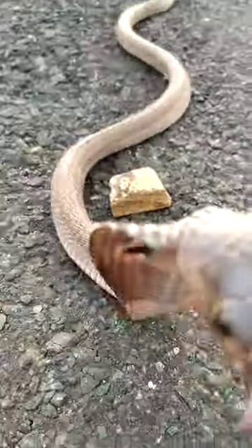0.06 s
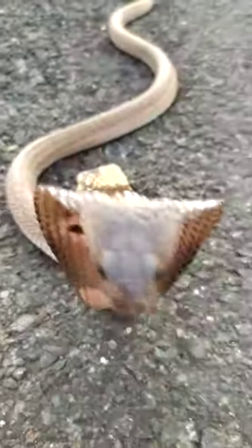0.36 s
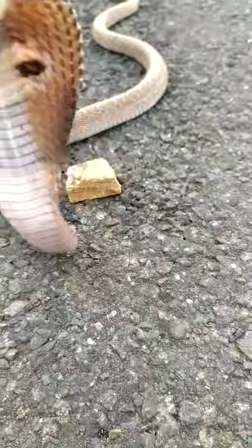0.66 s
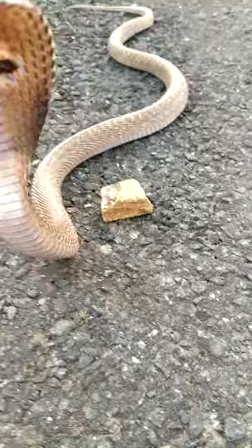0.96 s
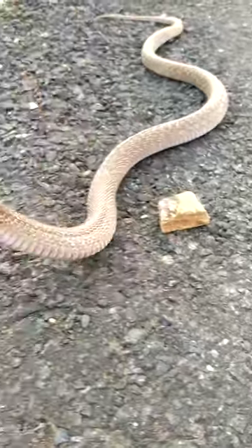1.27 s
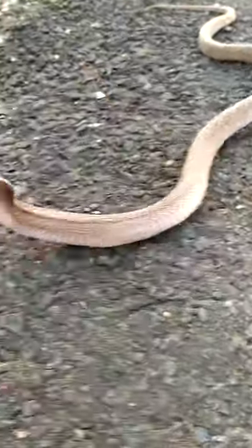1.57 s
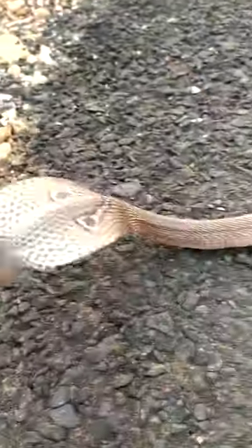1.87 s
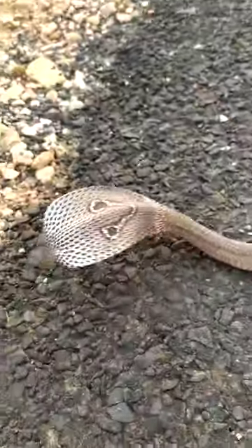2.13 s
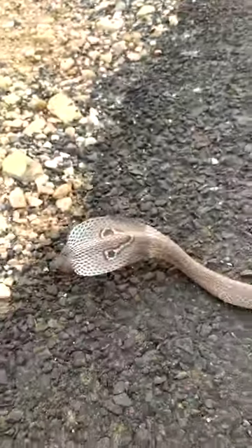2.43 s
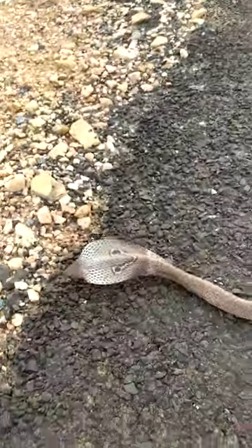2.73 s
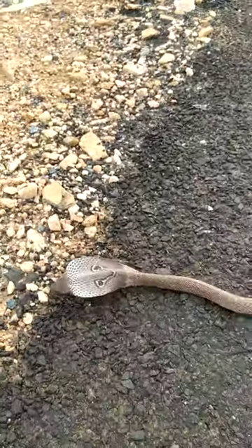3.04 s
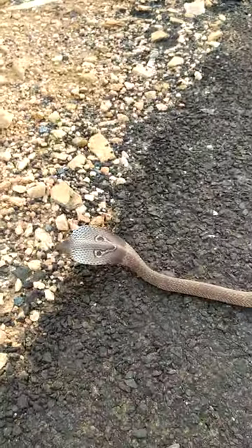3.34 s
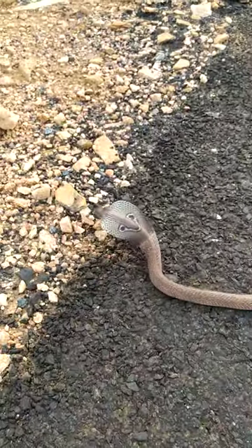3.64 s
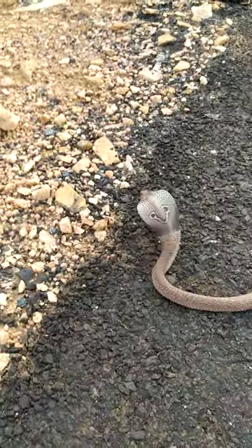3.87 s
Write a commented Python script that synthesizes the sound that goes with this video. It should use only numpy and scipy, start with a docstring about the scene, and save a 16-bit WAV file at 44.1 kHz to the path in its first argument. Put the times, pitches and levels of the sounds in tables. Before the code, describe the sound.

A snake hisses twice close to the microphone, first hollow and breathy, then sharper with a rising sweep. Wind rumbles on the microphone throughout, while faint birds whistle and hoot around an open roadside.

```python
"""On an asphalt road, a cobra hisses twice by forcing air through its windpipe and throat.
The first hiss is close, hollow and breathy. The second is sharp, and its colour sweeps upward as the
head swings away and the echo off the road follows ever sooner. Between them the snake breathes in.
Its scales scrape on grit, and wind buffets the camera's two microphones. Further off, one bird
whistles, another hoots on one note, others call faintly, and insects tick."""
import sys
import numpy as np
from scipy import signal
from scipy.fft import rfft, irfft, next_fast_len
from scipy.io import wavfile
from scipy.ndimage import uniform_filter1d, map_coordinates

SR = 44100
rng = np.random.default_rng(int(sys.argv[2]) if len(sys.argv) > 2 else 0)


def materialize(psi):
    """Save the field psi as 16-bit PCM at rate SR to the path in sys.argv[1].

    A 1-D psi becomes a single channel; in a 2-D psi each row is a channel.
    """
    bounded = np.clip(np.atleast_2d(psi).T, -1, 1)
    quanta = np.round(bounded * 32767).astype(np.int16)
    wavfile.write(sys.argv[1], SR, quanta)


N = 176400
T = np.arange(N) / SR

# The colour of each noise: how strong its low and high parts are. Each row: frequency in Hz, level in dB.
AIR_COLOUR = [(530, -64), (900, -1.5), (1190, -4), (1580, -9.5), (2160, -8), (2370, -6), (4370, -8),
              (4750, -8.5), (5160, -10.5), (7940, -6), (9060, -9.5), (13800, -11.5), (15700, -44)]
MURMUR_COLOUR = [(120, -7.5), (300, 0), (480, -2.5), (680, -1), (850, -3), (1100, -13.5), (1800, -21.5),
                 (4000, -45)]
CHORUS_COLOUR = [(6500, -26), (7200, -7), (7600, 17.5), (8200, 12), (8700, 9), (10000, -37)]
RUMBLE_COLOUR = [(20, -43.5), (32, -16), (42, -8), (52, 1.5), (65, 1.5), (85, -2), (120, -10), (165, -18),
                 (230, -28), (400, -44), (900, -76)]
THUD_COLOUR = [(40, -8), (90, 12.5), (140, 7.5), (220, -6.5), (330, -15), (500, -37), (800, -35),
               (2000, -72)]
SLAP_COLOUR = [(100, -20), (220, 7.5), (350, 11), (500, -14), (750, -15), (1200, -65), (3000, -50)]
SLITHER_COLOUR = [(600, -8.5), (1900, 3.5), (2600, 1.5), (3900, -1), (6000, -5), (10000, -7), (15000, -51)]
BREATH_COLOUR = [(1000, -33), (1500, 0), (1850, 0), (2250, -3), (3200, -10), (6000, -35)]
NEAR_BODY_COLOUR = [(120, 3.5), (260, -6), (340, -2.5), (470, 3.5), (580, -0.5), (700, -11.5), (860, -6),
                    (1050, -17.5), (1300, -40), (2500, -58)]
NEAR_LEFT_COLOUR = [(500, 18), (1200, 4.5), (1800, 7.5), (2500, -8), (3100, 4), (3700, -0.5), (4400, 6),
                    (5400, -2.5), (6600, -2), (7800, 1.5), (9200, 0.5), (11000, 7.5), (13500, 2),
                    (15700, -9)]
NEAR_RIGHT_COLOUR = [(500, -46), (1200, -3), (1950, 4), (2600, -5), (3100, -2.5), (3700, -3.5), (4400, 1.5),
                     (5400, -8.5), (6600, -6.5), (8500, -5), (11000, -12), (13500, -13), (15700, -9)]
SWING_TREBLE_COLOUR = [(400, -29), (1100, -18), (1900, 5), (2450, -1), (3000, -1.5), (3500, -1), (4200, 0),
                       (4750, 5.5), (5300, 2), (6300, 4.5), (7600, 5), (10000, 3), (13500, 0), (15700, 2)]
SWING_BODY_COLOUR = [(120, -4.5), (300, -6.5), (600, -3.5), (850, -7.5), (1100, -10), (1600, -14.5),
                     (3000, -37)]
ONSET_COLOUR = [(900, -10), (1400, -6), (1900, 3), (2400, -6), (3500, -36)]
SCATTER_COLOUR = [(1000, -12), (2000, 0), (2450, -4), (3000, 4), (4200, -3), (5900, 3), (6800, 2.5),
                  (8500, -3), (11000, -2), (15700, -9)]

# How each sound swells and fades. Each row: time in seconds, level in dB.
MURMUR_LEVEL = [(0, -59), (.6, -71.5), (.72, -71), (.95, -67.5), (1.3, -67.5), (2.2, -66.5), (2.5, -70),
                (2.8, -71), (3.05, -75), (3.97, -74.5)]
WIND_LEVEL = [(0.0, -55), (0.03, -46.5), (0.21, -35.5), (0.65, -48), (0.68, -38), (0.73, -44),
              (1.26, -53.5), (1.29, -41), (1.43, -48.5), (1.53, -41), (1.58, -48.5), (2.07, -42.5),
              (2.1, -55), (2.19, -38), (2.27, -64), (2.31, -43.5), (2.73, -45), (2.8, -34.5), (2.87, -41),
              (2.91, -37.5), (3.07, -46.5), (3.15, -39), (3.24, -48), (3.35, -43), (3.5, -54),
              (3.57, -41.5), (3.62, -53.5), (3.73, -51), (3.85, -36), (3.97, -39)]
SLITHER_LEVEL = [(.6, -75), (2.1, -71.5), (2.3, -72), (2.45, -71.5), (2.55, -71.5), (2.68, -72),
                 (2.83, -72.5), (2.95, -79.5), (3.15, -74), (3.23, -68), (3.33, -80), (3.65, -76),
                 (3.8, -69), (3.98, -80)]
BREATH_LEVEL = [(.52, -100), (.62, -76), (.74, -82), (.88, -78.5), (1.12, -75.5), (1.32, -84), (1.4, -100)]
SWING_LEVEL = [(1.28, -100), (1.37, -72.5), (1.46, -61), (1.6, -58.5), (1.72, -55.5), (1.95, -57),
               (2.055, -60), (2.085, -67.5), (2.14, -89)]  # the second hiss
ONSET_LEVEL = [(1.3, -83), (1.42, -68.5), (1.65, -70), (1.85, -76), (2.1, -90)]  # its throaty start
SCATTER_LEVEL = [(1.4, -1), (1.65, -13), (1.85, -6), (2.05, -0.5)]  # its scattered part, added to SWING_LEVEL

# How a sound leans to one side. Each row: time in seconds, push toward the left in dB.
WIND_SIDE = [(.25, -2), (.75, -3), (1.25, 5), (1.75, -6), (2.25, -9), (2.75, 4), (3.25, -7.5), (3.8, 5.5)]
SWING_TREBLE_SIDE = [(1.4, 0), (1.7, 4.5), (1.9, 11), (2.05, 13)]

# Ticking insects. Each row: first tick in seconds, seconds between ticks, pitch in Hz, level in dB.
INSECTS = [(.042, .15165, 7580, -71.5), (2.428, .1572, 8250, -73.5), (.59, .155, 8000, -79)]
# Far bird calls. Each row: start and length in seconds, first and last pitch in Hz,
# bend in the middle in Hz, level in dB.
FAR_CALLS = [(.8, .2, 2480, 1650, -150, -80), (2.71, .08, 1850, 2100, 130, -72),
             (2.775, .03, 3250, 3450, 100, -75), (2.805, .025, 3300, 3400, 1000, -76),
             (2.838, .038, 3200, 3300, 1200, -76), (3.09, .04, 2250, 2200, 50, -79),
             (3.42, .13, 1580, 1660, 20, -82), (3.765, .045, 2300, 2430, 40, -75),
             (3.885, .05, 2130, 1880, 30, -76)]
# Hoots. Each row: middle of the note in seconds, level in dB.
HOOTS = [(.595, -63.5), (1.215, -66), (2.362, -63), (2.935, -62.5), (3.505, -62.5)]
# Whistles, one list for each note. Each row: time in seconds, pitch in Hz, level in dB.
WHISTLES = [
    [(1.15, 3700, -82), (1.175, 3780, -74), (1.21, 4150, -70), (1.24, 4750, -70), (1.27, 5300, -84)],
    [(2.98, 3300, -86), (3.0, 4200, -73), (3.016, 4600, -71), (3.036, 4100, -73), (3.055, 5200, -69),
     (3.08, 5050, -74), (3.105, 4200, -81)],
    [(3.118, 3200, -76), (3.132, 4100, -66), (3.145, 4150, -65), (3.162, 3480, -72), (3.175, 3350, -73),
     (3.195, 4300, -64), (3.22, 4950, -70), (3.26, 5250, -70), (3.305, 5450, -82)],
]
# Swirls of wind. Each row: middle in seconds, thud level in dB, half length in seconds,
# left over right in dB, slap level in dB.
EDDIES = [(0.203, -37.5, 0.029, -0.5, -54), (0.282, -38, 0.015, -18.5, -79), (0.364, -44, 0.0083, 17, -67),
          (0.684, -47, 0.0055, 9, -93), (1.279, -59, 0.0077, 17, -76), (2.589, -42, 0.004, -14, -63),
          (2.62, -43, 0.066, -7.5, -72), (2.745, -43.5, 0.0097, 19.5, -83),
          (2.798, -37.5, 0.016, 20.5, -50), (2.917, -45, 0.019, 26.5, -50), (3.149, -43, 0.0084, -11, -81),
          (3.364, -52.5, 0.021, 20.5, -61.5), (3.868, -61, 0.0071, 11, -88), (3.954, -43.5, 0.022, 21, -67)]
# Scales catching on grit. Each row: start in seconds, level in dB, centre in Hz, width in octaves,
# seconds to fade by 60 dB.
SCUFFS = [(.320, -52.5, 5200, 0.13, 0.02), (0.32, -53, 4500, 1, 0.024), (0.774, -56.5, 1980, 0.38, 0.12),
          (0.776, -66, 5770, 0.69, 0.17), (.798, -62.5, 2480, 0.22, 0.059), (0.801, -66, 9500, 0.37, .04)]
# The first hiss. Each row: time in seconds, level of the hollow body in dB, level of the treble in dB.
NEAR_LEVELS = [(0, -47, -64.5), (.04, -57, -62.5), (.08, -53, -63.5), (.12, -50, -61), (.17, -50.5, -63),
               (.21, -51.5, -62.5), (.3, -53, -63), (.343, -54, -61), (.356, -42.5, -66), (.39, -52.5, -62),
               (.44, -53.5, -65.5), (.462, -50, -62), (.52, -53.5, -67.5), (.575, -63.5, -74),
               (.66, -96, -100)]
# How alike its treble is on both sides. Each row: frequency in Hz, likeness (1 same, -1 opposite).
NEAR_LIKENESS = [(1000, 0.064), (3000, -0.38), (4800, -0.75), (7500, 0.13), (9400, -0.66), (10900, 0.7),
                 (12300, -0.69), (15000, 0.72)]
# Delays as the head swings away. Each row: time in seconds, then the lag of the left microphone,
# of the left road echo and of the right road echo, all in milliseconds.
SWING_DELAYS = [(1.37, .21, .455, .68), (1.5, .17, .388, .6), (1.65, .118, .297, .51),
                (1.78, .1, .245, .43), (1.92, .07, .207, .33), (1.98, .05, .18, .29),
                (2.02, .04, .158, .27), (2.1, .02, .135, .24)]


def amp(db):
    """Turn decibels into a number to multiply by."""
    return 10 ** (np.asarray(db) / 20)


def unit(x):
    """Scale a sound to an average strength (rms) of 1."""
    return x / np.sqrt(np.mean(x ** 2) + 1e-20)


def pan(db):
    """Left and right gains that make the left db decibels louder."""
    return amp(np.array([db, -db]).reshape(2, -1) / 2)


def bell(x):
    """A smooth hump, 1 high where x is 0."""
    return np.exp(-.5 * x ** 2)


def curves(rows):
    """Join a table's points in time: one curve for each column after the first."""
    times, *columns = np.transpose(rows)
    return [np.interp(T, times, column) for column in columns]


def along(rows, hz):
    """Read a frequency table at hz, with octaves evenly spaced."""
    frequencies, values = np.transpose(rows)
    return np.interp(np.log(hz + 1), np.log(frequencies), values)


def wobble(rate):
    """A smooth curve through rate random points a second."""
    return map_coordinates(rng.standard_normal(int(N * rate / SR) + 4), [T * rate])


def tone(pitch_hz):
    """A pure tone that follows a changing pitch."""
    return np.sin(2 * np.pi * np.cumsum(pitch_hz) / SR)


def delayed(x, ms):
    """Delay a sound by a time that may change as it plays."""
    return map_coordinates(x, [np.arange(N) - ms * SR / 1000], order=5)


def filtered(x, response):
    """Multiply each frequency in a sound by response(hz)."""
    size = next_fast_len(N + 8192)
    return irfft(rfft(x, size) * response(np.fft.rfftfreq(size, 1 / SR)), size)[..., :N]


def coloured(x, colour):
    """Shape a sound with a colour table, at strength 1."""
    return unit(filtered(x, lambda hz: amp(along(colour, hz))))


def noise(colour):
    """Noise with the given colour."""
    return coloured(rng.standard_normal(N), colour)


def pair(colour, alike):
    """Left and right noise, from unrelated (alike=0) to the same (alike=1)."""
    shared = np.sqrt(alike) * noise(colour)
    return shared + np.sqrt(1 - alike) * np.array([noise(colour), noise(colour)])


def background():
    """Thin, steady air and the low, slowly changing murmur of the land far away."""
    air = amp(-72.5) * pair(AIR_COLOUR, alike=.045) * pan(db=1.5)
    murmur = amp(curves(MURMUR_LEVEL)[0]) * pair(MURMUR_COLOUR, alike=.78) * pan(db=1.2)
    return air + murmur


def insect_chorus():
    """Distant insects blend into one high band of noise."""
    return amp(-82.5 + .49 * wobble(33)) * pair(CHORUS_COLOUR, alike=0) * pan(db=6.5)


def bushes(x, echo, fade_s=.3):
    """Roadside bushes scatter a sound and give it a short tail."""
    t = T[:SR // 2]
    tail = rng.standard_normal((2, len(t))) * amp(-60 * t / fade_s)
    return x + echo * signal.fftconvolve(x, tail / np.linalg.norm(tail[0]), axes=1)[:, :N]


def ticking_insects(half_s=.0065, fall_hz_per_s=17000):
    """Each insect repeats a high, falling tick at its own even pace."""
    out = np.zeros(N)
    for first_s, period_s, hz, db in INSECTS:
        from_tick_s = (T - first_s + period_s / 2) % period_s - period_s / 2
        pitch = hz - fall_hz_per_s * from_tick_s + 60 * wobble(200)
        started = T > first_s - period_s / 2
        out += started * amp(db + 1.5 * wobble(6.04)) * bell(from_tick_s / half_s) * tone(pitch)
    return out * pan(db=5)


def far_birds(trill_s=2.62, trill_half_s=.044, trill_rate_hz=66):
    """Far birds give one buzzy trill and faint calls that bend in pitch."""
    pitch = 2900 + 300 * signal.sawtooth(2 * np.pi * trill_rate_hz * T, 0)
    out = amp(-72) * np.exp(-((T - trill_s) / trill_half_s) ** 4) * tone(pitch)
    for start_s, length_s, from_hz, to_hz, bend_hz, db in FAR_CALLS:
        progress = np.clip((T - start_s) / length_s, 0, 1)
        arch = np.abs(np.sin(np.pi * progress))
        pitch = from_hz + (to_hz - from_hz) * progress + bend_hz * arch
        out += amp(db) * np.sqrt(arch) * tone(pitch)
    return out * pan(db=2)


def hooting_bird(pitch_hz=842, half_s=.024):
    """A far bird repeats one short, hollow note."""
    notes = sum(amp(db) * np.exp(-np.abs((T - middle_s) / half_s) ** 3) for middle_s, db in HOOTS)
    return notes * tone(pitch_hz + 4 * wobble(40)) * pan(db=3)


def whistling_bird():
    """A small bird on the left slides through pure notes, which reach the right side a little later."""
    out = np.zeros(N)
    for note in WHISTLES:
        hz, db = curves(note)
        singing = (T > note[0][0]) & (T < note[-1][0])
        fade = uniform_filter1d(1. * singing, size=300)
        pitch = uniform_filter1d(hz, size=500) + 25 * wobble(300)
        out += fade * amp(db + .88 * wobble(180)) * tone(pitch)
    return np.array([out, delayed(out, ms=.05)]) * pan(db=5)


def wind():
    """Veering wind rumbles on each microphone; passing swirls add a thud with a brighter slap."""
    rumble = pair(RUMBLE_COLOUR, alike=.16) * amp([[5], [-2]])  # left and right, in dB
    rumble *= amp(curves(WIND_LEVEL)[0] + .68 * np.array([wobble(17), wobble(21)]))
    rumble *= pan(curves(WIND_SIDE)[0])
    thuds = slaps = 0
    for middle_s, thud_db, half_s, side_db, slap_db in EDDIES:
        thuds += amp(thud_db) * pan(side_db) * bell((T - middle_s) / half_s)
        slap_s = .39 * half_s * np.where(T < middle_s, .5, 1)  # rises twice as fast as it falls
        slaps += amp(slap_db) * pan(side_db) * bell((T - middle_s) / slap_s)
    return rumble + thuds * pair(THUD_COLOUR, alike=.37) + slaps * pair(SLAP_COLOUR, alike=.29)


def scales(rise_s=.00033):
    """The belly slides grainily over the asphalt and now and then scuffs on grit."""
    out = amp(curves(SLITHER_LEVEL)[0] + 2.3 * wobble(160)) * pair(SLITHER_COLOUR, alike=.049)
    for start_s, db, centre_hz, octaves, fade_s in SCUFFS:
        age = np.maximum(T - start_s, 0)
        white = rng.standard_normal((2, N))
        scrape = unit(filtered(white, lambda hz: bell(np.log2((hz + 1) / centre_hz) / octaves)))
        level = amp(db - 60 * age / fade_s) * (1 - np.exp(-age / rise_s))
        out += level * scrape * pan(db=4.5)
    return out


def breath_in():
    """A faint rush through the throat as the snake refills its lung."""
    return amp(curves(BREATH_LEVEL)[0]) * pair(BREATH_COLOUR, alike=0) * pan(db=-1)


def windpipe(x, spacing_hz=287.3, reflection=.43, centre_hz=4500, octaves=.75):
    """The long windpipe, closed at one end, rings at many closely spaced pitches."""
    ringing = lambda hz: reflection * bell(np.log2((hz + 1) / centre_hz) / octaves)
    return filtered(x, lambda hz: 1 / (1 + ringing(hz) * np.exp(-2j * np.pi * hz / spacing_hz)))


def airway(x, spacing_hz=968, reflection=.26, fade_hz=12000):
    """Air passes the windpipe, then the throat, which adds broad, evenly spaced peaks of its own."""
    ringing = lambda hz: reflection * np.exp(-(hz / fade_hz) ** 2)
    throat = lambda hz: 1 / (1 - ringing(hz) * np.exp(-2j * np.pi * hz / spacing_hz))
    return unit(filtered(windpipe(x), throat))


def shaded(x, side_db, split_hz=6500, low_share=.36):
    """The camera's body shields the far microphone, most of all from the high treble."""
    low = filtered(x, lambda hz: 1 / (1 + (hz / split_hz) ** 4))
    return low * pan(low_share * side_db) + (x - low) * pan(side_db)


def near_hiss():
    """Air forced through the throat close by: a fluttering, hollow body under a smooth, wide treble."""
    body_db, treble_db = curves(NEAR_LEVELS)
    body = amp(body_db + 1.74 * wobble(70)) * pair(NEAR_BODY_COLOUR, alike=.95) * pan(db=1.5)
    # The angle splits each frequency into what both sides share (mid) and how they differ (side).
    angle = lambda hz: np.arccos(np.clip(along(NEAR_LIKENESS, hz), -1, 1)) / 2
    shares = lambda hz: np.array([np.cos(angle(hz)), np.sin(angle(hz))])
    mid, side = filtered(rng.standard_normal((2, N)), shares)
    left = amp(7.5) * coloured(mid + side, NEAR_LEFT_COLOUR)
    right = amp(1.5) * coloured(mid - side, NEAR_RIGHT_COLOUR)
    return body + windpipe(np.array([left, right])) * amp(treble_db + .38 * wobble(42))


def swinging_hiss(left_echo=.76, right_echo=.34):
    """The hiss arrives directly and off the road; the echo closes in, so the colour sweeps upward."""
    level_db, = curves(SWING_LEVEL)
    lag_ms, left_echo_ms, right_echo_ms = curves(SWING_DELAYS)
    treble = shaded(airway(noise(SWING_TREBLE_COLOUR)), curves(SWING_TREBLE_SIDE)[0])
    body = amp(-4 + .4 * wobble(44.3)) * noise(SWING_BODY_COLOUR) * pan(db=-1.5)
    onset = amp(curves(ONSET_LEVEL)[0]) * noise(ONSET_COLOUR)
    left, right = amp(level_db + 1.3 * wobble(50)) * (treble + body) + onset
    left = delayed(left + left_echo * delayed(left, left_echo_ms), lag_ms)
    right = right + right_echo * delayed(right, right_echo_ms)
    # The scattered share dips, then grows as the head turns away.
    scatter_db = level_db + curves(SCATTER_LEVEL)[0]
    scatter = amp(scatter_db) * airway(pair(SCATTER_COLOUR, alike=0)) * pan(db=-4)
    return np.array([left, right]) + scatter


def scene():
    """Add up the snake, the moving air and the distant wildlife."""
    chorus = insect_chorus()
    snake = near_hiss() + swinging_hiss() + scales() + breath_in()
    air = wind() + background()
    wildlife = hooting_bird() + bushes(whistling_bird() + ticking_insects(), echo=.5)
    wildlife += bushes(far_birds(), echo=.9)
    return chorus + wildlife + air + snake


def record(dry, centre_hz=2450, width_hz=800, top_hz=15750):
    """The camera widens the stereo sound in one treble band and keeps nothing above top_hz."""
    widen = lambda hz: amp(1.5 * bell((hz - centre_hz) / width_hz))
    mid = filtered((dry[0] + dry[1]) / 2, lambda hz: 1 / widen(hz))
    side = filtered((dry[0] - dry[1]) / 2, widen)
    return filtered(np.array([mid + side, mid - side]), lambda hz: hz < top_hz)


dry = scene()
out = record(dry)
materialize(out)
```